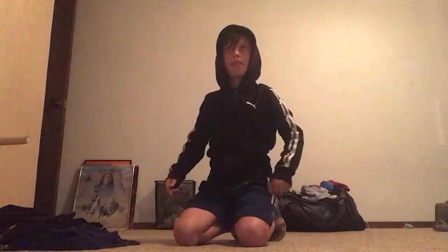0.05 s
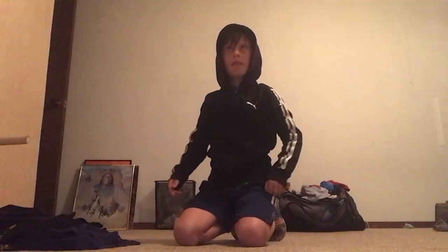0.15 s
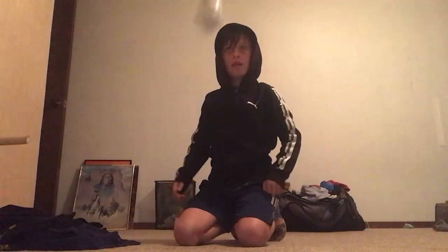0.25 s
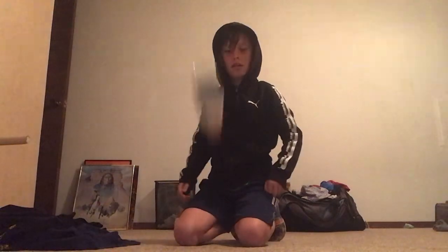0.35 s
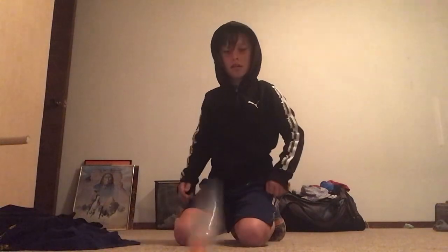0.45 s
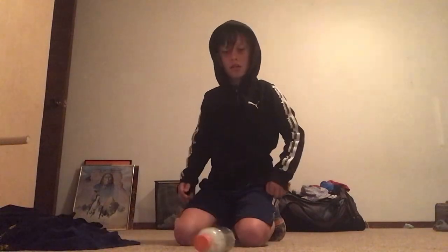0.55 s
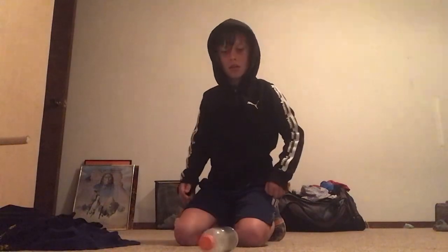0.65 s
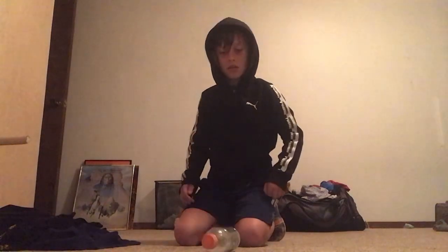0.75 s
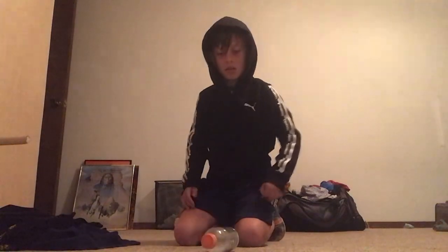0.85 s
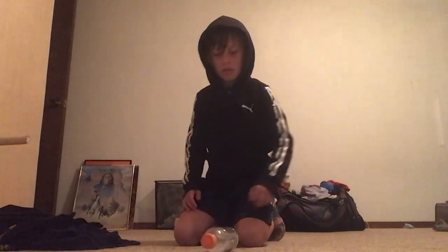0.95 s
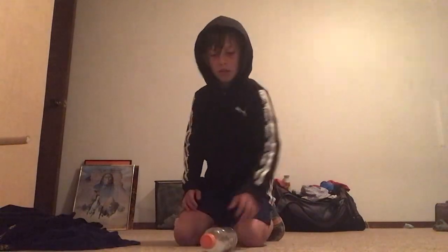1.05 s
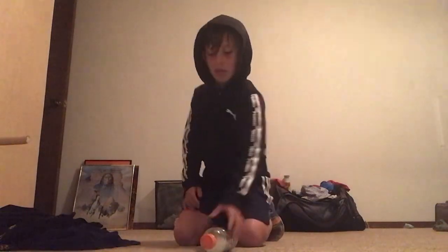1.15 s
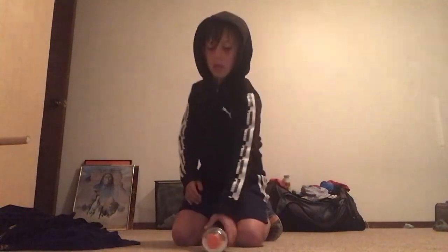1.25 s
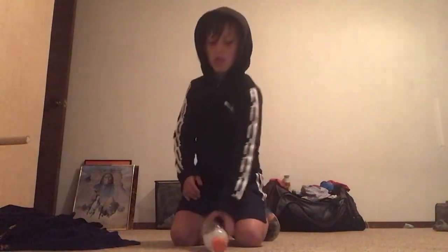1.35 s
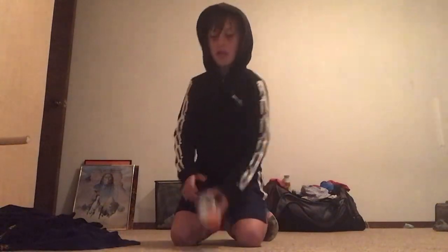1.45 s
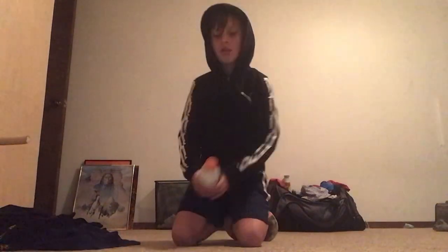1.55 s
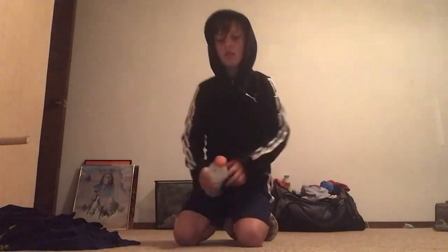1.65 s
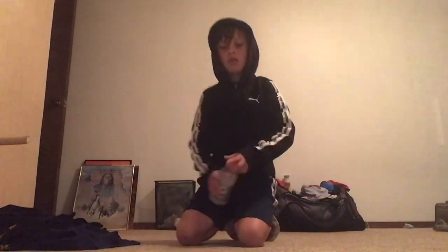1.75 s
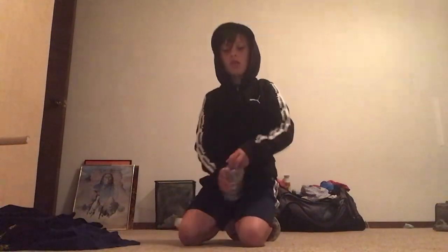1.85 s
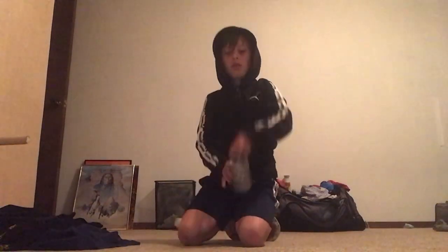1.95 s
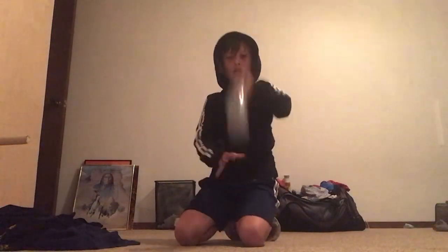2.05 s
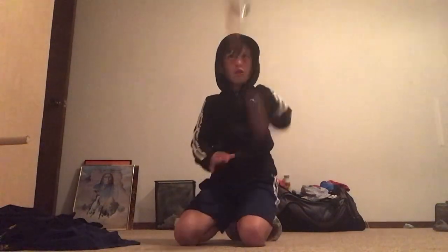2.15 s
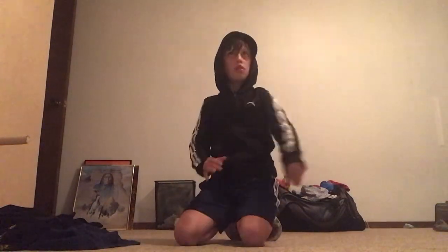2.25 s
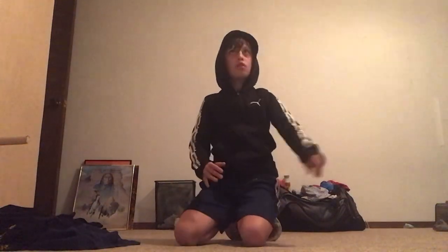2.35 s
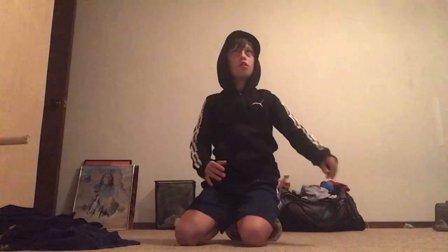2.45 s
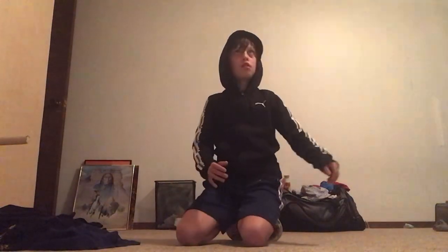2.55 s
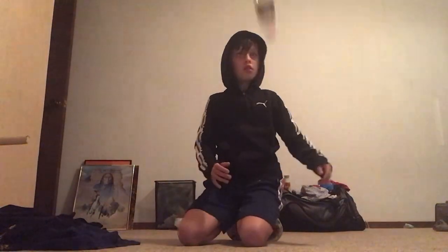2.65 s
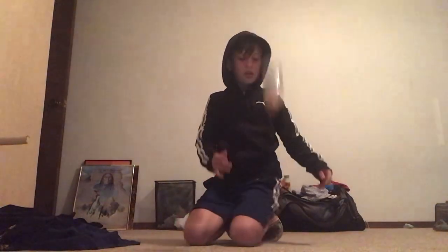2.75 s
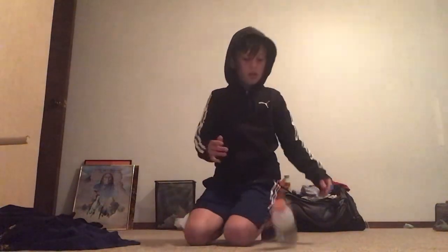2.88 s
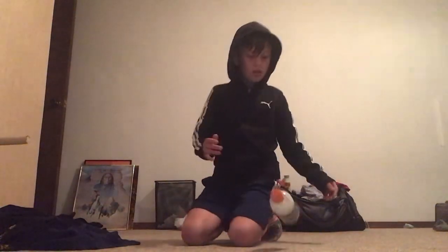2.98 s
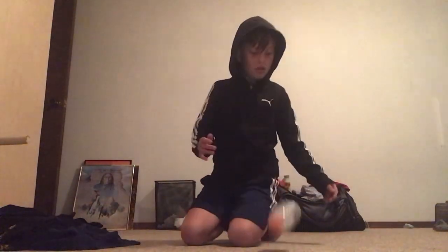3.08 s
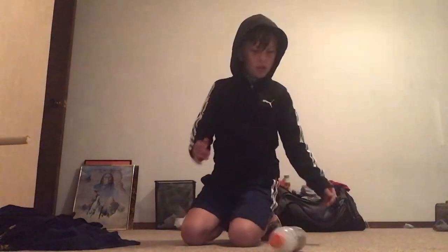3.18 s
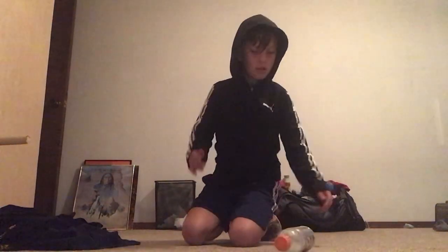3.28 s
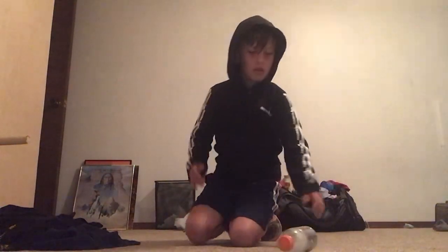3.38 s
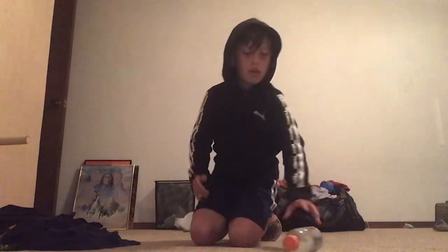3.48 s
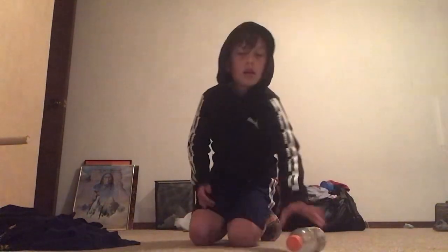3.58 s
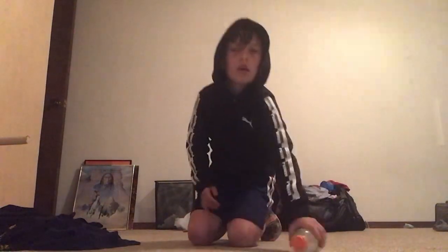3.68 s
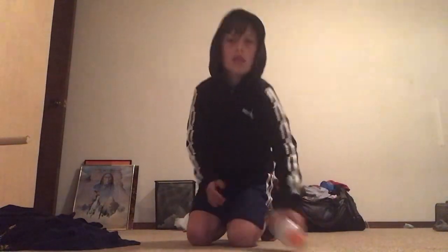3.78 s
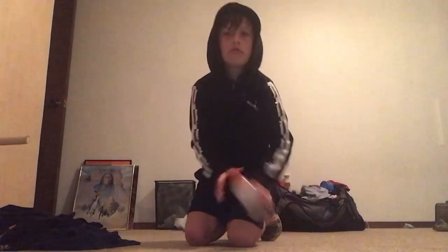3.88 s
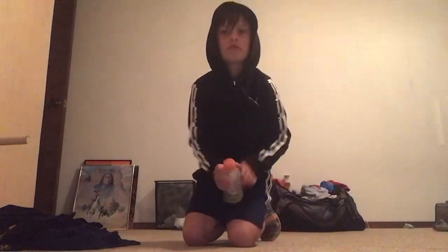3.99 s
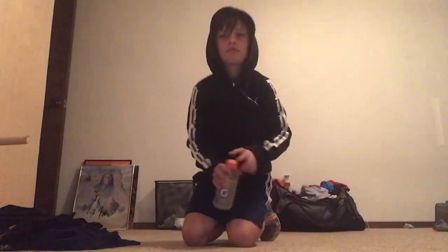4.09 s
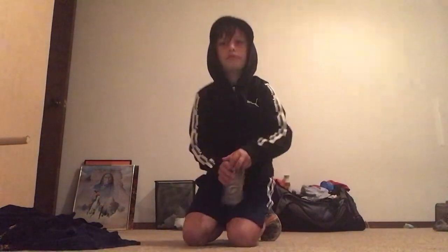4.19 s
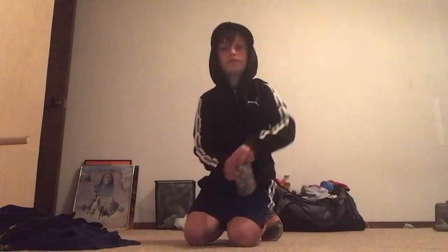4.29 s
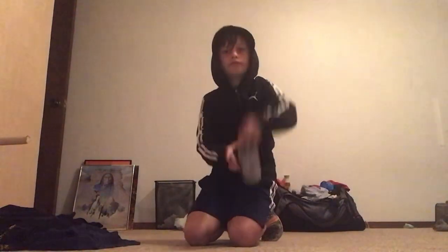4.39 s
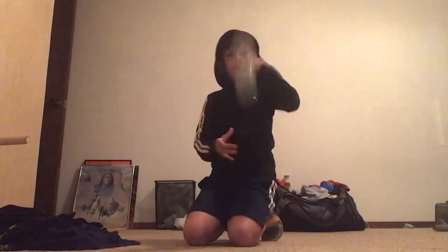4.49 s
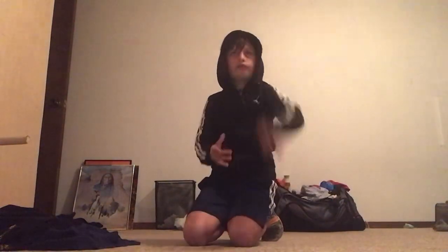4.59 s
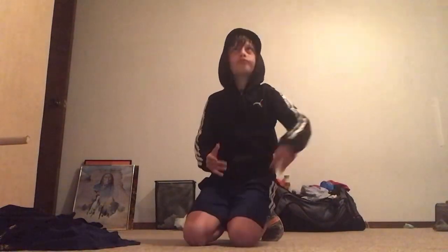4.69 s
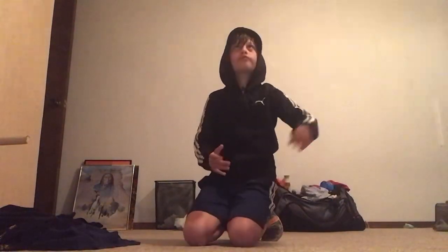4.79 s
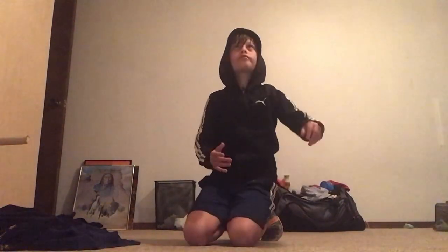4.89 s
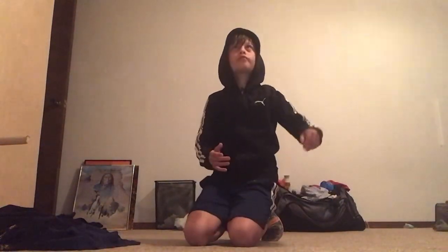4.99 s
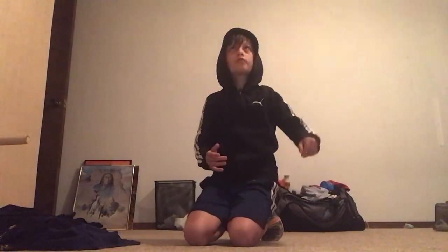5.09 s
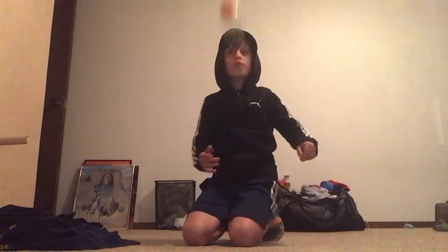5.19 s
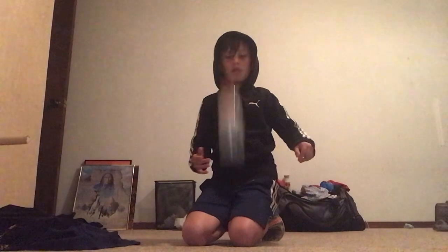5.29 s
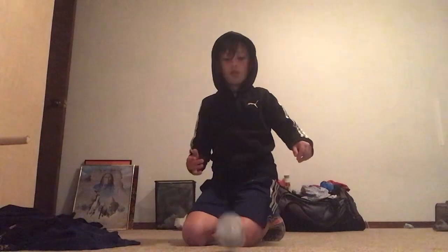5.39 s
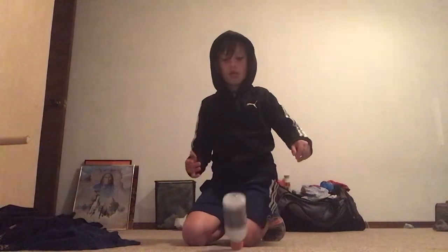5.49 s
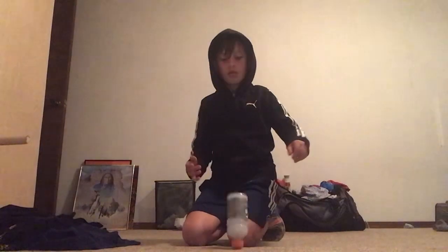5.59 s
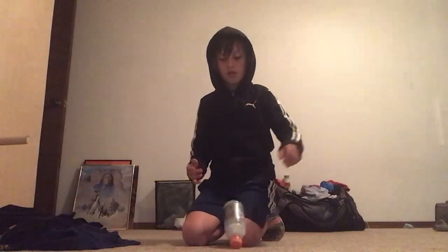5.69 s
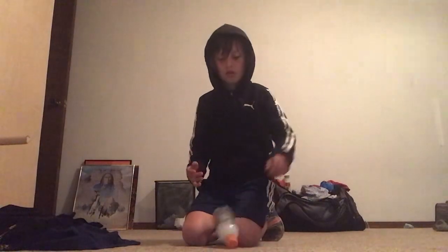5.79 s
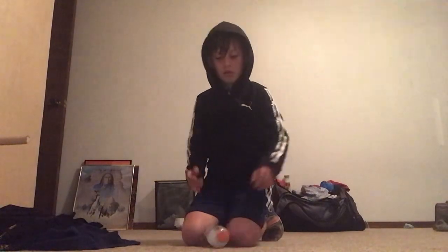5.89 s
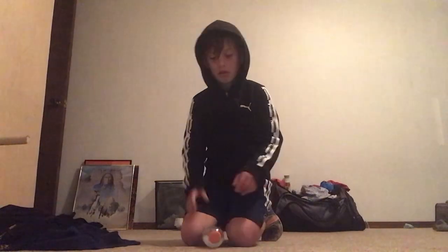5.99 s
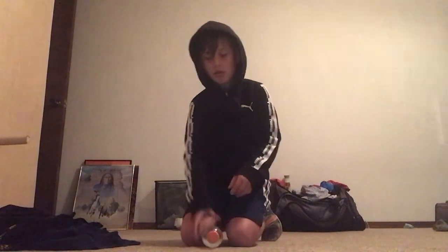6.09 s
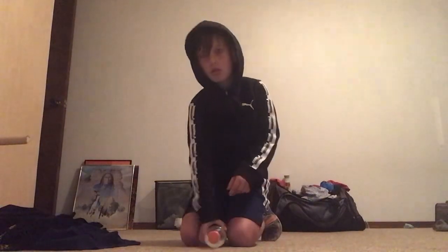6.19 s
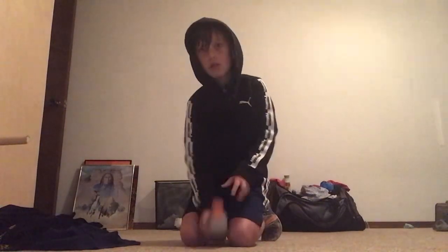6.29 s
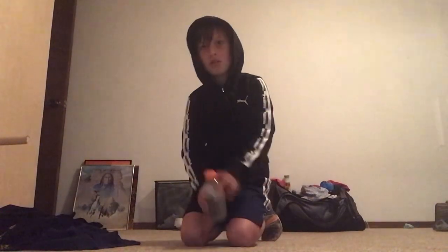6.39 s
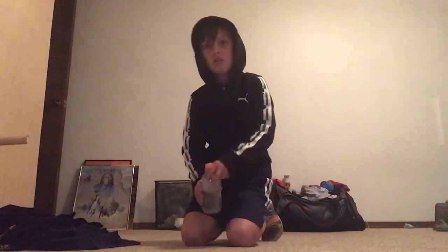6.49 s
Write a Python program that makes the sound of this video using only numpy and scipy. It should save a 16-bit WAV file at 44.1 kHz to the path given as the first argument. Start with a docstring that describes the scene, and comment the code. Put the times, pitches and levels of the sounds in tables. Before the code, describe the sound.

Three dull thuds of a plastic water bottle landing on carpet, with soft plastic ticks, sloshes and sleeve rustles between throws.

```python
"""In a small room, a part-filled plastic bottle is flipped and thuds onto the carpet three times.
Each landing is a quick run of blows (rim, base, wall, then the water catching up), and the last two
end in a bounce or a topple. Between throws a hand grabs the bottle: its thin wall ticks and pops,
bubbles ring in the sloshing water and sleeves rustle. The room booms on its low notes and adds a
short bright echo, over the faint rumble and hum of the house."""
import sys
import numpy as np
from scipy import signal
from scipy.fft import rfft, irfft
from scipy.io import wavfile
from scipy.ndimage import uniform_filter1d

SR = 44100
rng = np.random.default_rng(int(sys.argv[2]) if len(sys.argv) > 2 else 0)


def transcribe(signal):
    """Save signal, clipped to [-1, 1], as a 16-bit WAV file at the path in sys.argv[1]."""
    frames = np.atleast_2d(signal).T
    limited = np.clip(frames, -1, 1)
    pcm = np.round(limited * 32767).astype(np.int16)
    wavfile.write(sys.argv[1], SR, pcm)


N = 288414

# tone of the still air in the house: (frequency [Hz], level [dB])
AIR_TONE = [(20, -18), (35, -7), (55, 4), (90, -1), (150, -3.5), (220, -12), (380, -15.5), (520, -22.5),
            (950, -33.5), (2700, -36.5), (6000, -37.5), (9000, -40.5), (12000, -48), (16000, -58)]
# faint steady hum: (pitch [Hz], level [dB])
HUM_NOTES = [(59.5, -75), (298, -80.5), (612, -91)]
# standing waves, the notes the room booms on: (pitch [Hz], level [dB], side [+1 or -1])
# side is +1 when bottle and microphone are on the same side of the wave's quiet spot
ROOM_NOTES = [(100, 0, 1), (147.14, 14.5, 1), (166.3, 3, 1), (175.1, 7, -1), (219.1, 3, 1), (229, -8, -1),
              (240, -6.5, 1), (247.3, 1, -1), (260, -15, 1), (289.4, -4, -1), (312, -12.5, -1),
              (331, -6, 1), (345, -3.5, -1), (365.7, 7, 1), (407, 0.5, -1), (415, -0.5, -1), (471, 10, -1)]
# tone of the room's echo: (frequency [Hz], level [dB])
ECHO_TONE = [(100, -14.5), (300, -3.5), (450, 1.5), (600, 2), (900, -3.5), (2000, 0.5), (5000, 3.5),
             (8000, -3.5), (11000, -2.5), (16000, -1.5)]
# how long the echo lasts: (frequency [Hz], time to fade by 60 dB [s])
ECHO_FADE = [(100, 0.14), (400, .38), (900, .33), (2000, 0.3), (5000, 0.28), (9000, 0.21), (15000, 0.11)]

# an arm moves and its sleeve rustles: (middle time [s], length [s], level [dB])
ARM_MOVES = [(1.407, 0.12, -67.5), (1.993, 0.1, -69), (2.42, 0.26, -81.5), (2.85, 0.16, -71),
             (3.595, 0.13, -69), (4.154, 0.4, -64), (4.81, 0.11, -76.5), (6.26, 0.12, -62)]
# tone of rubbing cloth: (frequency [Hz], level [dB])
CLOTH_TONE = [(100, -9.5), (300, 19.5), (700, 1), (1200, -9), (2000, -1.5), (3000, -1.5), (5500, -2),
              (8000, -9.5), (11000, -20.5), (16000, -21)]
# tone of skin slapping plastic: (frequency [Hz], level [dB])
PALM_TONE = [(300, -19), (1500, -24), (3000, -11), (4500, 1), (6500, 2), (9000, -4.5), (12000, -18),
             (16000, -27)]
# tone of spray inside the bottle: (frequency [Hz], level [dB])
SPRAY_TONE = [(200, -15.5), (500, 5.5), (900, 1.5), (1500, 2), (2500, -5.5), (4000, -10), (8000, -24),
              (16000, -41)]

# the thin wall ticks under a finger: (time [s], level [dB])
FINGER_TICKS = [(0.324, -67.5), (1.205, -61.5), (1.286, -64), (1.351, -62), (1.393, -59.5), (1.642, -54),
                (1.819, -54), (1.948, -55), (2.229, -50.5), (3.498, -55), (3.582, -61), (3.7, -51.5),
                (4.132, -63.5), (4.452, -59), (4.635, -48), (4.998, -69.5), (5.143, -69), (6.24, -55.5)]
# tone of those ticks and of tiny snaps under a grip: (frequency [Hz], level [dB])
SNAP_TONE = [(300, -5), (1500, -1.5), (3000, -6.5), (6000, 2), (8500, -4.5), (11000, -15.5), (16000, -23.5)]
# tone of crinkling plastic: (frequency [Hz], level [dB])
CRINKLE_TONE = [(200, -11), (600, 3), (1200, -11), (1500, -3.5), (2000, -1.5), (3000, -13), (4500, -1.5),
                (6600, -2.5), (9000, -3.5), (11000, -15.5), (13000, -22), (15500, -31.5)]
# tone of the sharp crack of a hard landing: (frequency [Hz], level [dB])
CRACK_TONE = [(300, -30.5), (3000, -19.5), (5000, -2), (7000, 1), (9500, -1), (11000, -6.5), (13000, -8),
              (15500, -10)]
# a dent in the wall pops back: (time [s], pitch [Hz], level [dB])
DENT_POPS = [(1.288, 804, -60.5), (2.238, 1580, -46), (2.931, 1110, -28), (4.574, 2495, -43),
             (4.579, 620, -39.5), (4.62, 4010, -45.5)]
# the notes the hollow wall rings on: (pitch [Hz], level [dB], time to fade by 60 dB [s])
WALL_NOTES = [(735, -8.5, 0.031), (767, -4.5, 0.037), (839, -5, 0.044), (945, -12.5, 0.051),
              (1058, -10.5, 0.043), (1210, -15.5, .015), (1847, -20.5, 0.052), (2600, -22.5, .01)]

# a hand takes hold: (time [s], thud [dB], thud pitch [Hz], crackle [dB], sliding [dB])
HAND_GRIPS = [(1.5, -48.5, 413, -73.5, -92), (1.572, -42.5, 335, -49, -56), (1.806, -62, 368, -55.5, -62),
              (3.676, -55.5, 386, -53.5, -59.5), (3.793, -49.5, 374, -70, -71.5),
              (3.958, -32, 358, -42, -63), (4.094, -54.5, 395, -77, -72), (6.207, -50, 249, -66, -69.5),
              (6.412, -48, 297, -71.5, -84.5), (6.434, -49.5, 294, -54.5, -78)]
# the wrist flicks, then the fingers let go:
# (time [s], thud [dB], thud pitch [Hz], crackle [dB], wait before letting go [s])
WRIST_FLICKS = [(2.167, -46, 295, -52, 0.049), (4.574, -41, 305, -54.5, .046)]
# the bottle bounces or topples: (time [s], thud [dB], thud pitch [Hz], crackle [dB], sliding [dB])
CARPET_BOUNCES = [(3.166, -30.5, 302, -59.5, -57.5), (3.204, -36, 245, -50, -74),
                  (5.671, -46, 306, -46.5, -55.5), (5.907, -46.5, 269.6, -64.5, -64.5)]
# the bottle lands: (time [s], thud pitch [Hz], base thud [dB], wall thud [dB], water thud [dB],
# buckling [dB], rim's head start [s], wall's delay [s], water's delay [s])
CARPET_LANDINGS = [(0.5078, 251, -14.5, -32.5, -13.5, -36, .0152, 0.0073, .0176),
                   (2.9289, 253.2, -14, -21.5, -8.5, -30.5, 0.0044, .0064, .0114),
                   (5.409, 259.7, -14, -9.5, -8.5, -30, .0068, .0053, .0177)]
# the four blows of a landing, a row each for rim, base, wall and water:
# (pitch [times the thud pitch], knock [dB above the buckling], crackle [dB above the buckling])
LANDING_STAGES = [(1.28, 2, -11), (1, -0.5, -3.5), (1.12, 14, 1), (.97, -3.5, -12.5)]

SILENT_DB = -120


def amp(db):
    """Turns decibels into a plain multiplier."""
    return 10 ** (np.asarray(db) / 20)


def evened(x):
    """Scales a signal to an average power of 1."""
    return x / np.sqrt(np.mean(x ** 2) + 1e-20)


def read(points, hz):
    """Looks up a frequency in a table, sliding smoothly between its rows."""
    table_hz, value = np.transpose(points)
    return np.interp(np.log(hz + 1), np.log(table_hz + 1), value)


def add(mix, s, sound):
    """Adds a sound to the mix, starting at s seconds."""
    part = mix[max(round(s * SR), 0):][:len(sound)]
    part += sound[:len(part)]


def swell(t, rise):
    """Rises to 1 at t = rise, then dies away."""
    return t / rise * np.exp(1 - t / rise)


def colour(x, tone, size=4096):
    """Filters a signal to the given tone; plain noise keeps its power."""
    log_gain = np.log(amp(read(tone, abs(np.fft.fftfreq(size, 1 / SR)))))
    response = np.exp(np.conj(signal.hilbert(log_gain)))  # rings after a hit, never before it
    taps = np.fft.ifft(response).real[:size // 2]
    return signal.oaconvolve(x, taps / np.linalg.norm(taps))[:N]


def grains(spread_db, size):
    """Rough noise, like many tiny snaps: a new random level every `size` samples."""
    levels = np.repeat(np.clip(rng.standard_normal(N // size + 1), -2, 2), size)[:N]
    return evened(rng.standard_normal(N) * amp(spread_db * levels))


def air():
    """The house rumbles softly, with a trace of hum and hiss."""
    t = np.arange(N) / SR
    hum = sum(amp(db) * np.sqrt(2) * np.sin(2 * np.pi * (hz * t + rng.random())) for hz, db in HUM_NOTES)
    tone = amp(read(AIR_TONE, np.fft.rfftfreq(N, 1 / SR)))
    rumble = irfft(rfft(rng.standard_normal(N)) * tone, N)
    return amp(-62.7) * evened(rumble) + hum


def wall_echo(t):
    """A blur of echoes builds up after a sound, and each frequency fades at its own speed."""
    hz, when, bands = signal.stft(rng.choice([-1., 1.], len(t)), SR, nperseg=256)
    fade_s = read(ECHO_FADE, hz)[:, None]
    bands = bands * amp(read(ECHO_TONE, hz)[:, None] - 60 * when / fade_s)
    bands *= np.sqrt(2 * np.log(1000) / (fade_s * SR))  # a longer fade adds no extra energy
    build_up = 1 - np.exp(-t / 0.0013)
    return signal.istft(bands, SR, nperseg=256)[1][:len(t)] * build_up


def room(x, boom_fade_s=0.37):
    """Low standing waves boom on, and the bare walls send back a short bright echo."""
    t = np.arange(SR * 3 // 4) / SR
    damping = np.log(1000) / boom_fade_s
    waves = sum(side * amp(db) * np.cos(2 * np.pi * hz * t) for hz, db, side in ROOM_NOTES)
    boom = 2 * damping / SR * np.exp(-damping * t) * waves
    # two echoes take turns, so the tail stays smooth, with no fixed ringing pitches
    turn = 2 * np.pi * 18.5 * np.arange(N) / SR
    echo = sum(signal.fftconvolve(x * share, wall_echo(t)) for share in (np.cos(turn), np.sin(turn)))
    return amp(1.5) * x + (signal.fftconvolve(x, boom) + echo)[:N]


def rubbing_speed(swish_s=0.054, swish_db=-59.5, slip_db=-56.5):
    """Rubbing swells as an arm moves or flicks, and after each bounce, grip and slip from the hand."""
    t = np.arange(N) / SR
    moves = ARM_MOVES + [(s, swish_s, swish_db) for s, *_ in WRIST_FLICKS]
    speed = sum(amp(db) * np.exp(-(2 * (t - s) / length) ** 2) for s, length, db in moves)
    slides = [(s, db) for s, *_, db in CARPET_BOUNCES + HAND_GRIPS]
    slides += [(s + release_s, slip_db) for s, *_, release_s in WRIST_FLICKS]
    for s, db in slides:
        add(speed, s, amp(db) * swell(t[:SR // 2], rise=0.032) ** 0.8)
    return speed


def rustles(snaps_per_s=120, snap_spread_db=4, catch_db=3):
    """Cloth and palms catch and slide unevenly, and the gripped plastic gives off tiny snaps."""
    speed = rubbing_speed()
    snapping = rng.random(N) < snaps_per_s / SR
    snaps = evened(snapping * amp(snap_spread_db * np.minimum(rng.exponential(1, N), 2.5)))
    wobble = evened(uniform_filter1d(rng.standard_normal(N), size=700))
    catches = evened(amp(catch_db * wobble))
    cloth = colour(speed * catches * grains(spread_db=6, size=90), CLOTH_TONE)
    return amp(-4) * cloth + amp(-8.5) * colour(speed * snaps, SNAP_TONE)


def palms():
    """Skin slaps and skids on the plastic at each grip: a short bright hiss."""
    t, burst = np.arange(SR // 10) / SR, np.zeros(N)
    for s, _, _, crackle_db, _ in HAND_GRIPS:
        add(burst, s, amp(crackle_db - 2) * swell(t, rise=0.0043))
    return colour(burst * grains(spread_db=5.5, size=40), PALM_TONE)


def sloshes(middle_hz=1340, spread_octaves=2.2, bubbles=24):
    """A jolt flings water at the wall, trapping bubbles that ring briefly and rise in pitch."""
    t, out = np.arange(SR // 25) / SR, np.zeros(N)
    splashes = [(s, db - 21.5) for s, db, *_ in CARPET_BOUNCES + HAND_GRIPS]
    splashes += [(s + lag, db - 9) for s, db, *_, release_s in WRIST_FLICKS for lag in (0, release_s)]
    for s, db in splashes:
        for delay, pitch, softness in rng.random((bubbles, 3)):
            start_hz = middle_hz * 2 ** (spread_octaves * (pitch - 0.5))
            cycles = start_hz * t * (1 + 3 * t)
            ring = np.exp(-cycles / 0.82) * np.sin(2 * np.pi * cycles)
            add(out, s + 0.084 * delay ** 2, amp(db - 4.9 * delay - 9.4 * softness) * ring)
    return out


def spray():
    """At a landing the water breaks into spray against the wall: a dense, rough burst."""
    t, burst = np.arange(SR // 4) / SR, np.zeros(N)
    for s, _, _, _, _, buckle_db, *_ in CARPET_LANDINGS:
        add(burst, s, amp(buckle_db - 8.5) * swell(t, rise=0.0078))
    return colour(burst * grains(spread_db=6.5, size=60), SPRAY_TONE)


def pops():
    """A dent snaps back and rings for a moment on two close notes."""
    t, out = np.arange(SR // 20) / SR, np.zeros(N)
    for s, hz, db in DENT_POPS:
        pair = np.sin(2 * np.pi * hz * t) + 0.57 * np.sin(2 * np.pi * hz * 1.09 * t)
        add(out, s, amp(db - 5.5) * swell(t, rise=0.0023) * pair)
    return out


def bump(s, thud_db, hz, crackle_db, knock_db, water_db, water_hz, lag_s=0.01247):
    """A light contact, then the water's dull thud; knock_db and water_db count from the first thud."""
    return [(s, thud_db, hz, thud_db + knock_db, crackle_db),
            (s + lag_s, thud_db + water_db, water_hz, SILENT_DB, SILENT_DB)]


def blows(settle_s=0.03414, settle_hz=173):
    """Every blow on the bottle: (time [s], thud [dB], thud pitch [Hz], knock [dB], crackle [dB])."""
    rows = []
    for s, hz, base_db, wall_db, water_db, buckle_db, rim_s, wall_s, water_s in CARPET_LANDINGS:
        rim_db = base_db - 5.5
        run = [(-rim_s, rim_db), (0, base_db), (wall_s, wall_db), (water_s, water_db)]
        for (lag, thud_db), (ratio, knock_db, crackle_db) in zip(run, LANDING_STAGES):
            rows.append((s + lag, thud_db, hz * ratio, buckle_db + knock_db, buckle_db + crackle_db))
    for s, db, hz, crackle_db, _ in CARPET_BOUNCES:
        rows += bump(s, db, hz, crackle_db, knock_db=-9.5, water_db=-1.5, water_hz=207)
    for s, db, hz, crackle_db, _ in HAND_GRIPS:  # the palm muffles the knock and the water
        rows += bump(s, db, hz, crackle_db - 3, knock_db=-18.5, water_db=-11, water_hz=179)
    for s, db, hz, crackle_db, release_s in WRIST_FLICKS:
        rows += bump(s, db, hz, crackle_db, knock_db=-0.5, water_db=-0.5, water_hz=257)
        rows.append((s + release_s, db - 4, hz, db - 10, crackle_db - 3))  # the fingers let go
        # in flight, the water thumps into the far end
        rows.append((s + release_s + settle_s, db - 6.5, settle_hz, SILENT_DB, SILENT_DB))
    return rows


def crackles(early_s=0.02):
    """The wall buckles in a burst of snaps at each blow, and ticks under a finger."""
    t = np.arange(SR // 10) / SR
    snap_power, hiss_power, tick_power = np.zeros((3, N))
    # a brief soft hiss swells and fades around each blow
    hiss_envelope = np.exp(-abs(t - early_s - 0.005) / 0.0033)
    # each tick fades in and out quickly, with a softened start
    tick_envelope = np.exp(-abs(t - early_s - 0.002) / 0.0017)
    for s, *_, crackle_db in blows():
        add(snap_power, s, amp(crackle_db) ** 2 * swell(t, rise=0.0037) ** 4)
        add(hiss_power, s - early_s, amp(crackle_db) ** 2 * hiss_envelope)
    for s, db in FINGER_TICKS:
        add(tick_power, s - early_s, amp(db) ** 2 * tick_envelope)
    crinkle = colour(np.sqrt(snap_power) * grains(spread_db=-2, size=6), CRINKLE_TONE)
    # no square root here, so only hard blows crack
    crack = colour(snap_power * grains(spread_db=-4, size=6), CRACK_TONE)
    hiss = colour(np.sqrt(hiss_power) * rng.standard_normal(N), CLOTH_TONE)
    ticks = colour(np.sqrt(tick_power) * grains(spread_db=0, size=6), SNAP_TONE)
    return amp(-1) * crinkle + amp(28) * crack + amp(-2.5) * (hiss + ticks)


def thuds(push_hz=150):
    """The water's weight pushes the soft wall and bounces briefly; the hollow wall rings above it."""
    t, out = np.arange(SR // 6) / SR, np.zeros(N)
    push = amp(-13.5) * swell(t, rise=0.0036) ** 2 * np.sin(2 * np.pi * push_hz * t)
    knock = sum(amp(db - 60 * t / fade_s) * np.sin(2 * np.pi * hz * t) for hz, db, fade_s in WALL_NOTES)
    knock *= 1 - np.exp(-t / 0.0012)  # a soft contact eases the ring in
    for s, thud_db, thud_hz, knock_db, _ in blows():
        bounce = swell(t, rise=0.0029) ** 1.1 * np.sin(2 * np.pi * thud_hz * t)
        add(out, s, amp(knock_db) * knock - amp(thud_db + 0.5) * (bounce + push))
    return out


def scene():
    """Bottle, hands, water and sleeves sound in the room, over its quiet air."""
    sources = thuds() + pops() + crackles() + palms() + spray() + sloshes() + rustles()
    return (room(sources) + air())[None]


def record(dry, low_cut_hz=70, high_cut_hz=15950):
    """A small microphone loses the deep bass, and the very highest treble is cut off."""
    thin = signal.sosfilt(signal.butter(4, low_cut_hz, "high", fs=SR, output="sos"), dry)
    treble_cut = signal.firwin(511, high_cut_hz, window=("kaiser", 9), fs=SR)
    return signal.oaconvolve(thin, treble_cut[None], "same")


dry = scene()
out = record(dry)
transcribe(out)
```